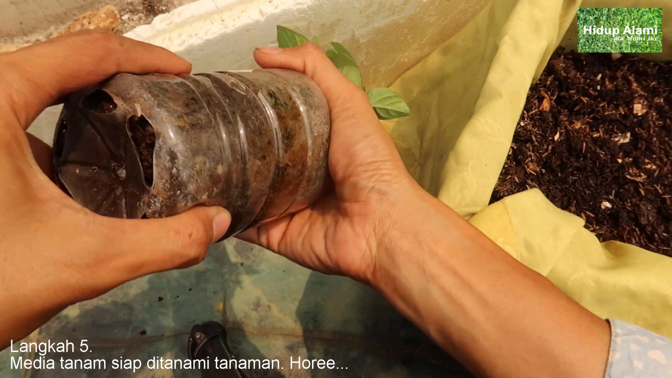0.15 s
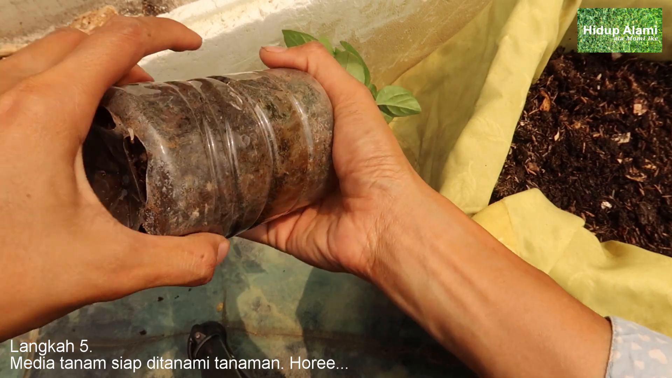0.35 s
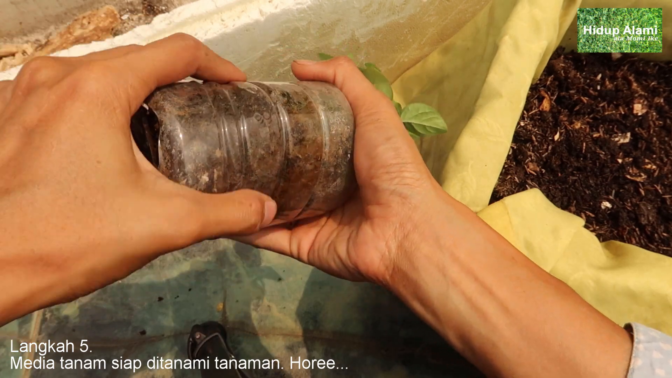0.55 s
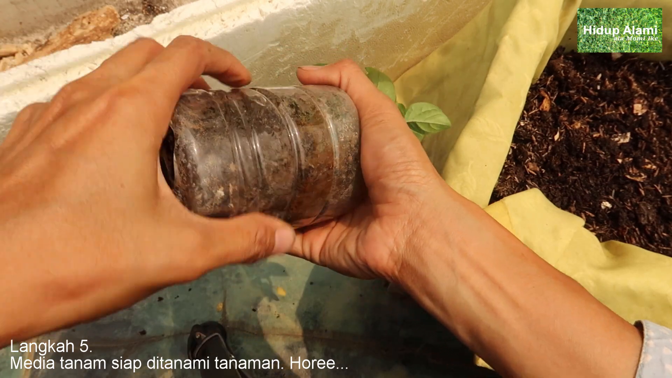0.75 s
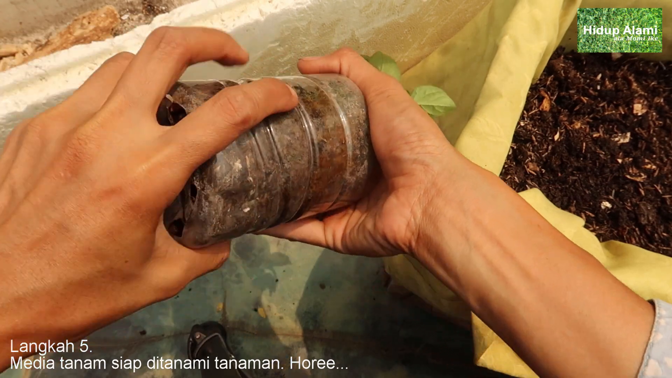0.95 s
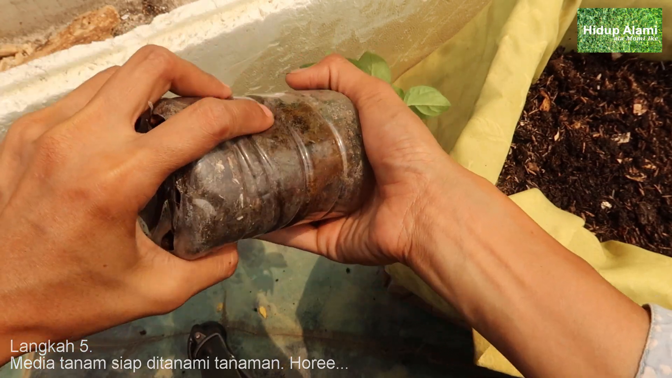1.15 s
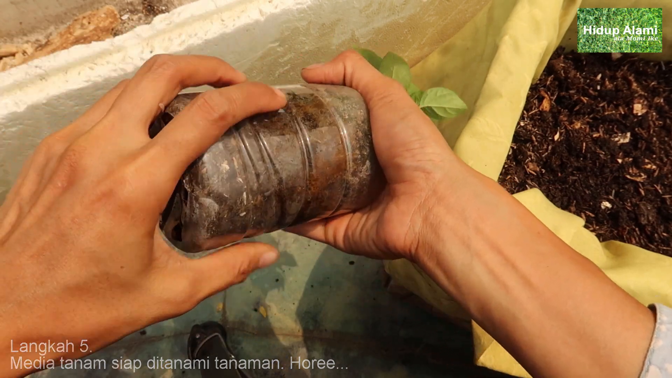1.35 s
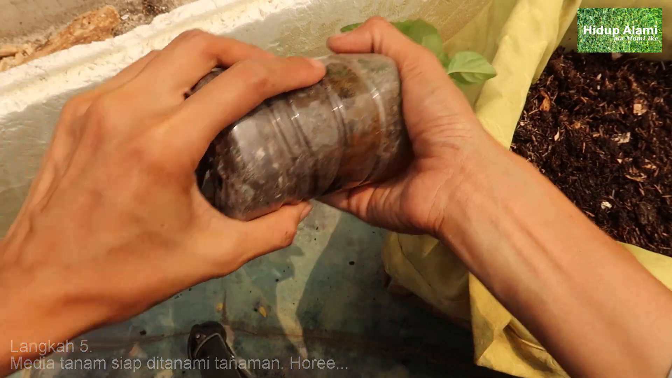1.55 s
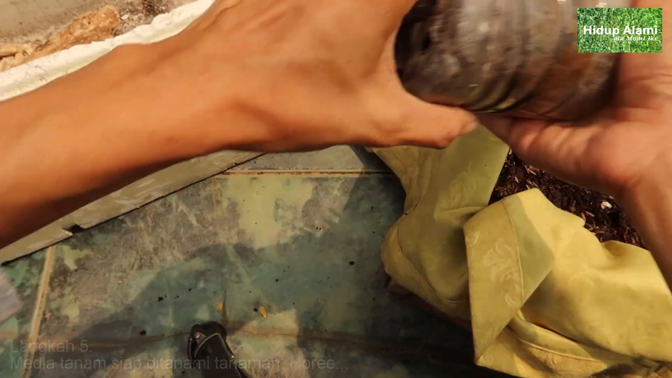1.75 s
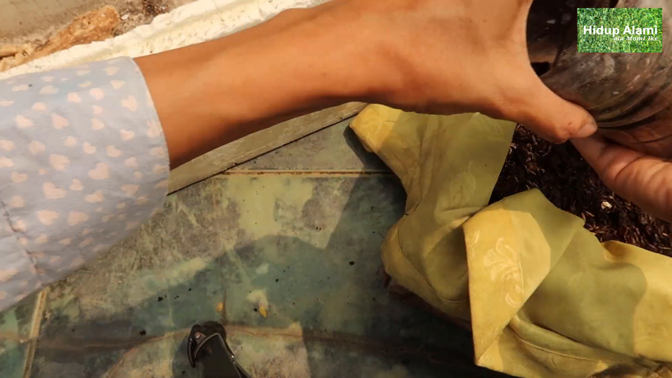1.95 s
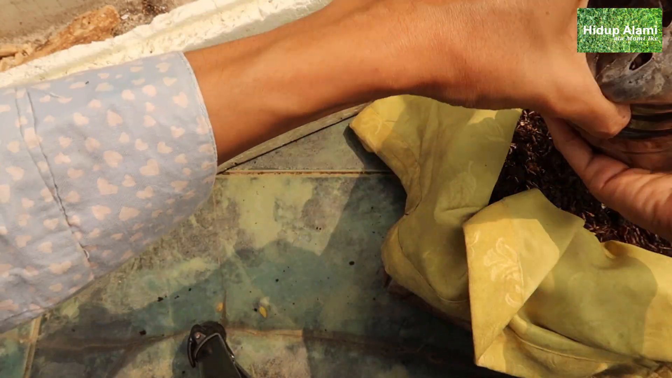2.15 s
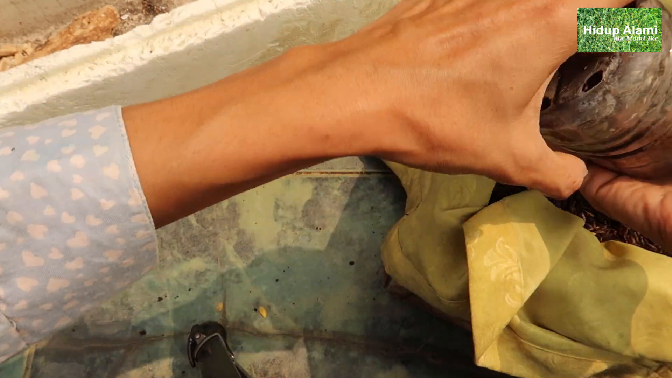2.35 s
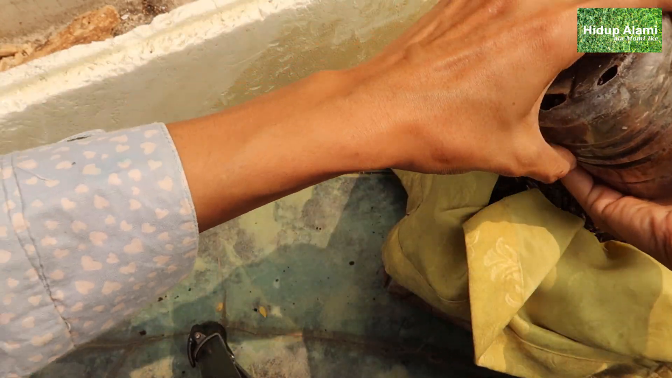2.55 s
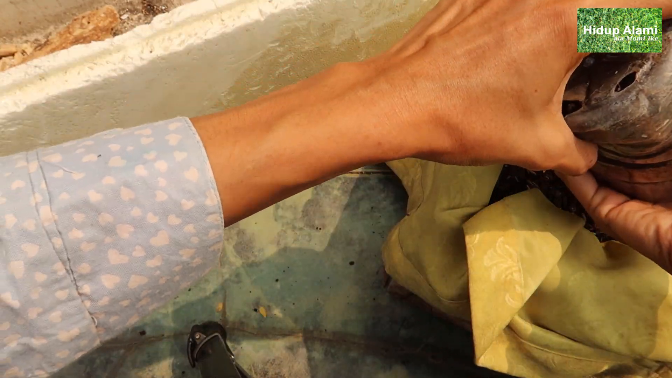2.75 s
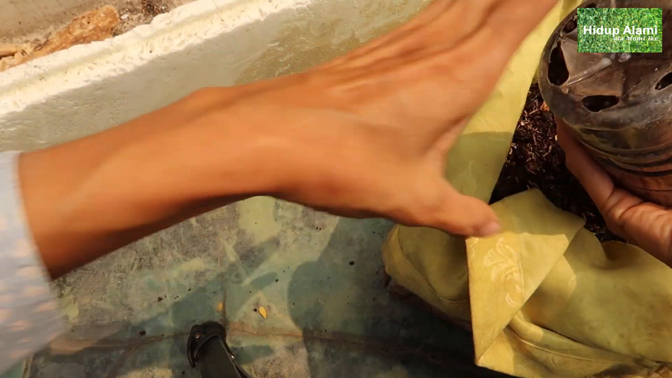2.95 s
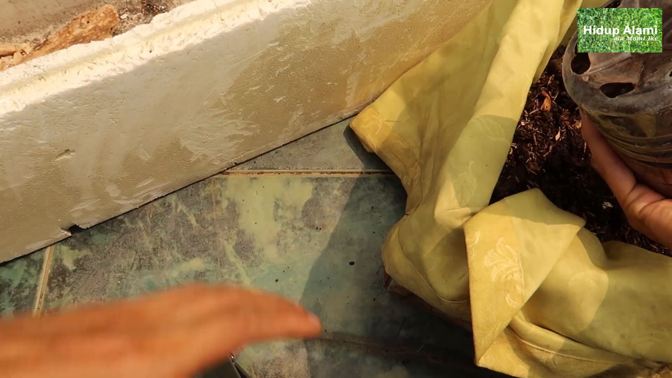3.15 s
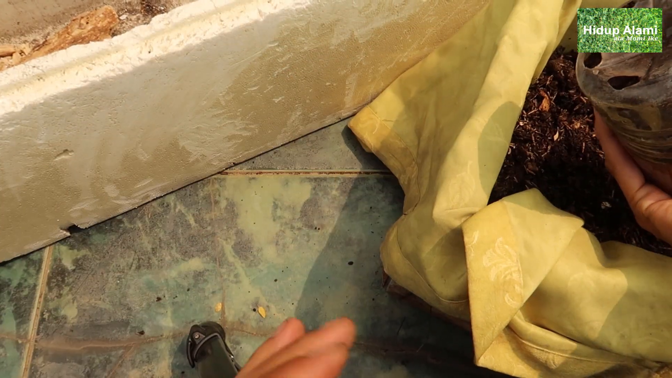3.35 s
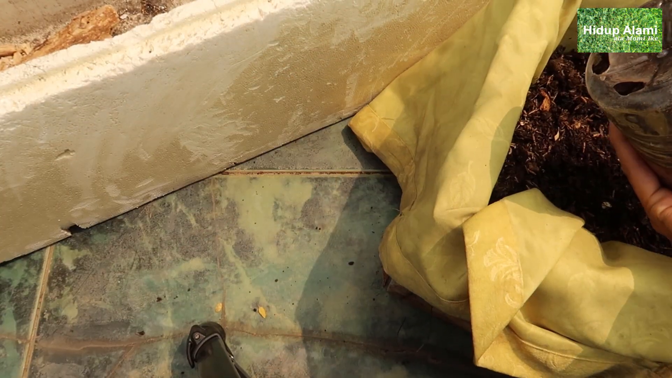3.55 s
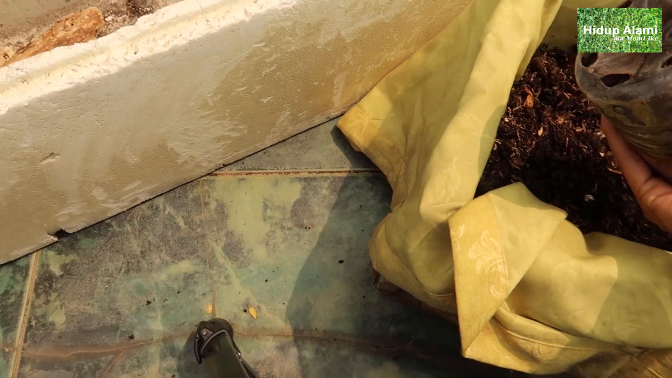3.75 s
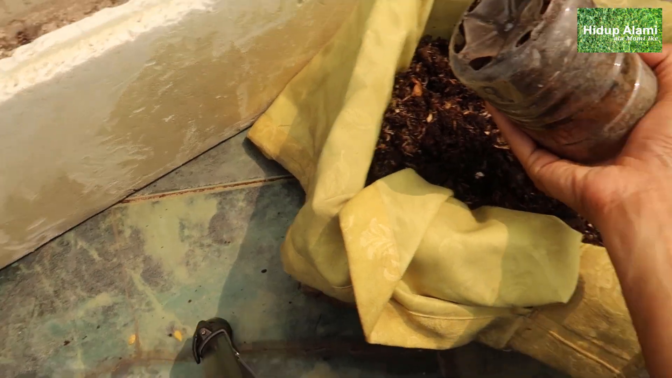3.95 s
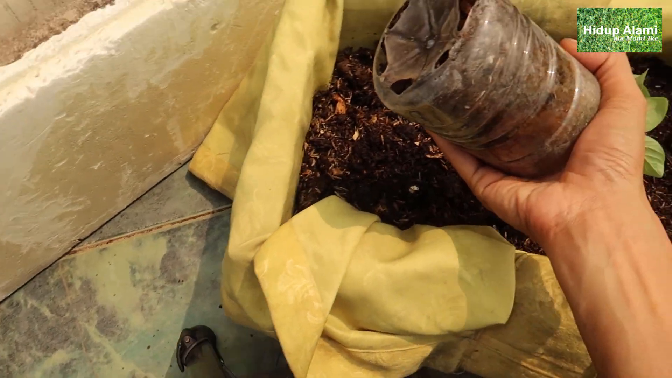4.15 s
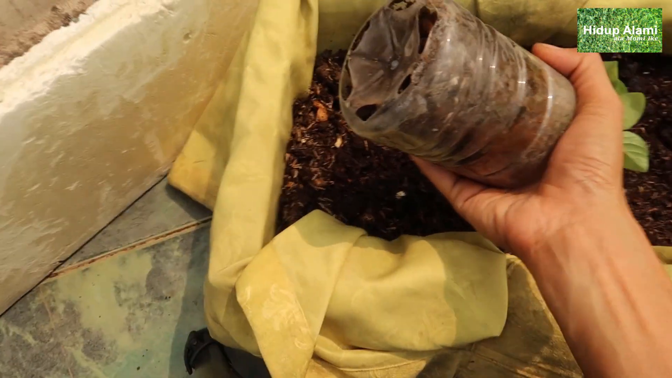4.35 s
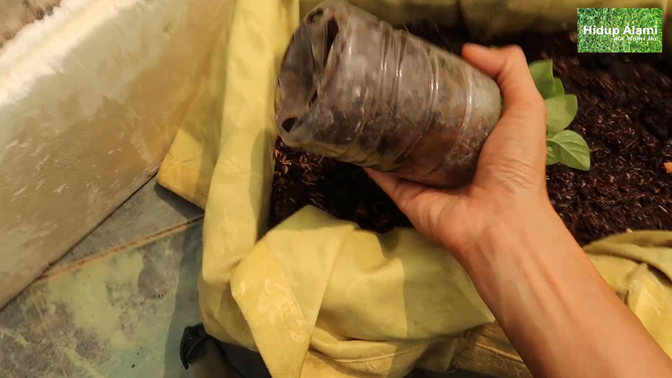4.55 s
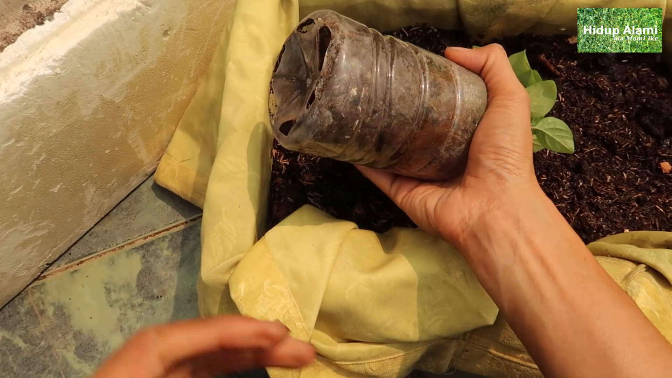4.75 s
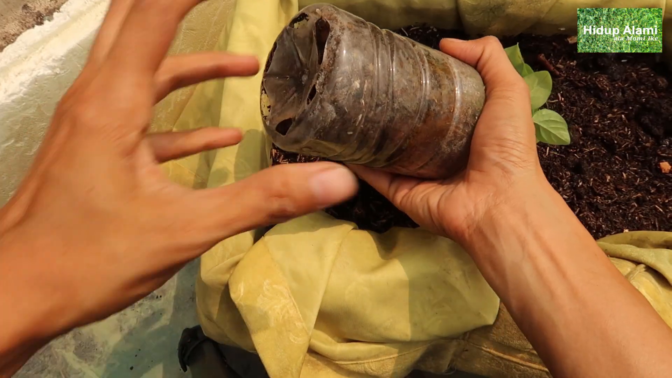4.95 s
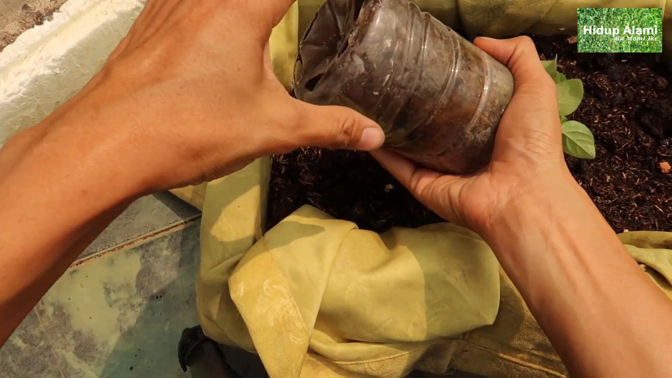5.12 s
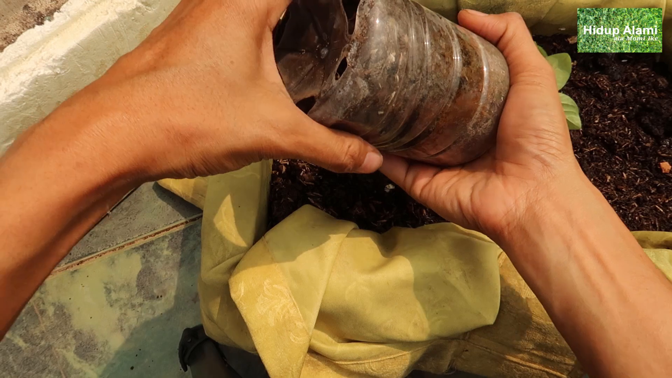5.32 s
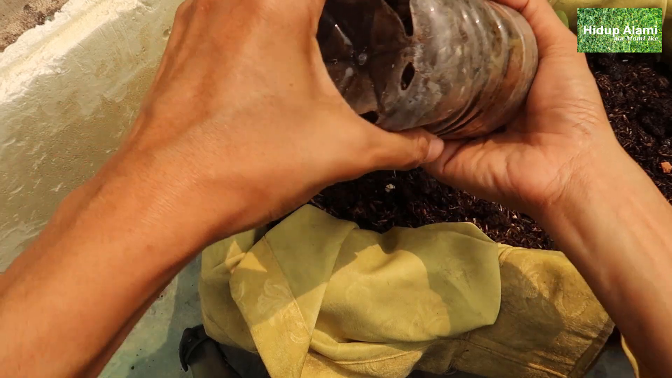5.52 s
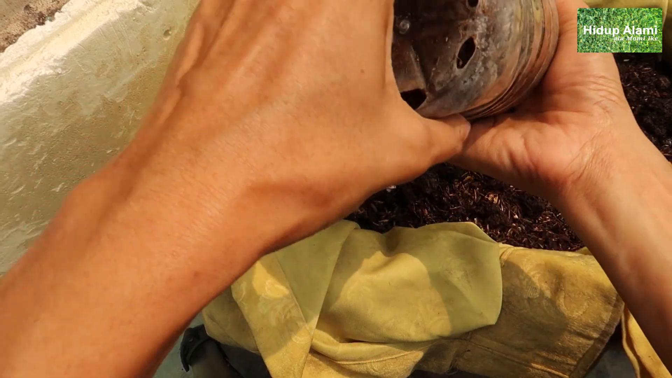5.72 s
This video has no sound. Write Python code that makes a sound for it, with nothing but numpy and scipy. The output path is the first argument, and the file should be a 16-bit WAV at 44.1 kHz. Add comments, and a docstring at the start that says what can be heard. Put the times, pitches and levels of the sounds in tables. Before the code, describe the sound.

Outdoors, close to a stereo microphone, a thin plastic bottle packed with soil is squeezed and turned by hand. From 0 to 0.35 s low wind pops flutter under a fast cluster of snaps, the loudest near 0.14 and 0.33. Each is a dry, bright crack with a short hollow knock, damped by soil, and a tiny scattered tail. Single strong cracks come around 0.65, 0.96, 1.17 and 1.45, with fine gritty rustling between. A faint thin whistle appears near 1.85. Crackle clusters follow at 2.2-2.4 and 2.75, then sharp snaps at 2.92 and 3.13; the whistle returns lower near 3.2. From 3.3 to 4.2 handling almost stops while a distant noise wash and motor hum climb. Dull small crackles resume at 4.3-4.6; wind buffets heavily, strongest at 4.8-5.1. Scratchy rubbing and lighter clicks follow, with one clearer snap near 5.62, over breeze and hum to the end.

```python
"""A thin plastic bottle full of soil, squeezed and rolled by hand outdoors, heard at two microphone ports.
Each dent snaps: slip bursts ring the damped wall, knock the body and shove the air; a scattered tail follows.
Fingers and grit rustle as filtered noise ticks; wind buffets the ports as banded noise with single pops.
Behind: a distant noise drone and the harmonics of a motor hum, both sinking and climbing back;
a faint sine whistle sounds twice."""
import sys
import numpy as np
from scipy import signal
from scipy.fft import rfft, irfft
from scipy.io import wavfile
from scipy.ndimage import uniform_filter1d

SR = 44100
rng = np.random.default_rng(int(sys.argv[2]) if len(sys.argv) > 2 else 0)


def bounce(signal):
    """Save signal as a 16-bit WAV file at the path given by the first command-line argument."""
    frames = np.transpose(np.atleast_2d(signal))
    limited = np.clip(frames, -1, 1)
    pcm = np.round(limited * 32767).astype(np.int16)
    wavfile.write(sys.argv[1], SR, pcm)


N = 254898

# far-off whistle: (time [s], pitch [Hz], level [dB])
WHISTLE = [(1.82, 3000, -95), (1.845, 3010, -74), (1.87, 3040, -80), (1.893, 3150, -75), (1.92, 3000, -80),
           (1.93, 2980, -120), (3.16, 2390, -120), (3.17, 2385, -90), (3.19, 2380, -68), (3.235, 2370, -71),
           (3.27, 2365, -66), (3.3, 2360, -70), (3.32, 2350, -90), (3.33, 2350, -120)]
# motor hum: (time [s], turning rate [Hz], reference level [dB])
HUM = [(0, 55.18, -75.5), (2.55, 52.2, -69.5), (2.67, 53.03, -60.5), (2.84, 57.2, -57), (2.97, 55.64, -60),
       (3.3, 55.86, -62.5), (3.7, 55.92, -58), (4.2, 56.08, -46), (4.7, 56.42, -46.5), (5.2, 56.9, -44),
       (5.5, 57.5, -46.5), (5.78, 58.3, -47)]
# hum harmonics: (multiple of turning rate, level re reference [dB])
HUM_LINES = [(2, -3.5), (3, -3.5), (4, -10.5), (5, -10.5), (6, 4), (7, -5.5), (8, -13.5), (9, -7.5),
             (10, -5), (11, -9.5), (12, -16)]
# distant drone: (time [s], level [dB])
DRONE = [(0.0, -50), (0.34, -57.5), (0.79, -52), (1.13, -56), (1.53, -62.5), (1.72, -62), (2.28, -55.5),
         (2.86, -55.5), (3.19, -57), (3.8, -52), (4.46, -43.5), (5.78, -43)]
# drone spectrum: (frequency [Hz], relative level [dB])
DRONE_COLOUR = [(250, -36), (430, -8.5), (620, -10), (900, -12), (1500, -18.5), (2860, -26.5),
                (5590, -41.5), (14000, -57)]
# breeze under the gusts: (time [s], big eddies [dB], small eddies re big [dB])
BREEZE = [(0, -42.5, -5), (.4, -51.5, 2), (1.0, -53, 2), (1.45, -50.5, -2), (1.55, -66, 4),
          (2.05, -57.5, 0.5), (2.3, -47.5, -8), (2.55, -60.5, 8), (3.28, -54.5, -3.5), (3.9, -47.5, -2.5),
          (4.25, -43, 1.5), (4.75, -37, -5.5), (5.2, -33, -2.5), (5.45, -32, -12), (5.67, -44, 8.5),
          (5.78, -31.5, -10)]
# wind spectrum: (frequency [Hz], relative density [dB per Hz])
WIND_COLOUR = [(15, -55.5), (25, -23.5), (76, -5), (124, -8), (189, -1), (380, -6.5), (447, -10),
               (579, -21), (628, -24.5), (1200, -44), (1560, -73), (2640, -120)]
# gusts: (time [s], length before decay [s], big eddies [dB], small eddies re big [dB], share unlike in the ports [0-1])
GUSTS = [(0.034, 0.071, -33, 6.5, 0.2), (0.115, 0.096, -38.5, 7, 0.33), (0.233, 0.11, -47, 5, 0.3),
         (0.89, 0.052, -52, -5, 0), (2.104, 0.029, -46, -10, 0), (2.637, 0.18, -51.5, -11.5, 0.03),
         (2.814, 0.079, -44, -15, 0.2), (3.369, 0.06, -51, -7.5, 0.1), (4.263, 0.053, -39, -9, 0.12),
         (4.363, 0.018, -26, -12, 0), (4.447, 0.031, -32.5, -9, 0.1), (4.527, 0.05, -32, -21, 0.5),
         (4.616, 0.031, -26, -16, 0.25), (4.785, 0.23, -28, 0.5, 0.93), (5.024, 0.062, -30.5, -0.5, 0.64)]
# single eddies popping on the ports: (time [s], peak [dB], frequency [Hz], left minus right [dB])
POPS = [(0.063, -16.5, 322, -9), (0.078, -15, 320, 1), (0.09, -33, 191, -1), (0.106, -17.5, 397, -8),
        (0.141, -17, 306, 3), (0.166, -17, 366, 6), (0.175, -14.5, 390, 1), (0.184, -38, 639, 17),
        (0.199, -17, 228, 1), (0.221, -25.5, 310, 8), (0.268, -30, 332, -4), (0.311, -25, 317.5, 2),
        (4.27, -22.5, 196, 0.5), (4.559, -25.5, 226, 3), (4.634, -33, 322, 2), (4.799, -9.5, 250, -9),
        (4.812, -12.5, 230, 1), (4.827, -28, 150.5, 12), (4.843, -8.5, 252, -3), (4.875, -17, 170, 3),
        (4.888, -26, 560, -4), (4.894, -15, 296, -8), (4.909, -28.5, 580, 22), (4.928, -18, 139.2, -2),
        (4.983, -27, 620, 11.5), (4.905, -7.5, 236, 0.5), (4.946, -35, 315, 6), (4.974, -9, 181, -2),
        (4.996, -15, 130.7, 6), (4.99, -19.5, 386, 0), (5.007, -28, 321, 1), (5.03, -15.5, 220, -4),
        (5.041, -20.5, 132, 3), (5.074, -18, 200, 4)]
# fingers and grit sliding: (time [s], length before decay [s], level [dB], scrape re level [dB])
STROKES = [(0, 0.15, -59, -4), (0.182, 0.19, -60.5, -1), (0.362, 0.044, -76, 1.5), (0.429, 0.11, -72, 1),
           (0.723, 0.14, -75, -14), (0.547, 0.11, -64, -3), (0.809, 0.069, -65, 1), (0.893, 0.097, -64, -4),
           (1.014, 0.01, -63, -8), (1.056, 0.19, -62.5, -5), (1.379, 0.11, -66, 0),
           (1.794, 0.11, -63.5, -4), (1.992, 0.13, -72, 1), (2.107, 0.16, -65.5, -4),
           (2.295, 0.13, -64, -2.5), (2.455, 0.041, -70, -5), (2.53, 0.076, -82.5, 1),
           (2.612, 0.02, -66.5, -4), (2.652, 0.14, -65, 1.5), (2.82, 0.15, -66.5, 0.5), (3.3, 0.04, -76, 5),
           (3.564, 0.1, -74.5, -2), (3.694, 0.53, -90.5, 5), (4.267, 0.017, -59.5, 2),
           (4.37, 0.022, -75.5, -2), (4.465, 0.026, -69, -7), (4.635, 0.37, -67.5, -15),
           (5.057, 0.039, -52.5, 0), (5.134, 0.048, -56, -5), (5.199, 0.032, -50, -4),
           (5.253, 0.071, -55.5, -3), (5.359, 0.03, -55, -2), (5.396, 0.075, -57, -1),
           (5.486, 0.16, -60.5, -2), (5.645, 0.099, -76, 4), (5.705, 0.022, -51, 1), (5.729, 0.051, -53, 0)]
# rustle spectrum: (frequency [Hz], relative level [dB])
RUSTLE_COLOUR = [(2500, -11), (3600, -9.5), (4600, 0), (7000, -5.5), (10000, -11.5), (14000, -15.5),
                 (16300, -29)]
# dents: (time [s], low ring [Hz], peak [dB], crack [Hz], peak [dB], bright ring [Hz], peak [dB],
# top ring [Hz], peak [dB], air peak [dB], knock peak [dB], knock [Hz], slip decay at 2500 Hz [ms], thump re knock [dB])
SNAPS = [(0.0701, 2100, -30, 2800, -15.5, 6400, -15.5, 7500, -22, -39, -25.5, 990, 3.3, -24.0),
         (0.1064, 2740, -17.5, 4310, -16.0, 7100, -16, 7900, -18, -24, -25.5, 1050, 5.5, -30.0),
         (0.1385, 2130, -24.5, 2950, -21, 6100, -33, 7500, -40.5, -54.0, -14, 1190.0, 2.1, -30.0),
         (0.1423, 2610, -7, 3550, -5.5, 6360, -6.0, 7180, -23, -17.5, -8, 1040, 2.7, -30),
         (0.1727, 2140, -57, 3380, -40, 5180, -45, 8110, -52, -60.5, -38, 730, 4.0, -30.0),
         (0.2312, 2080, -52.0, 2900, -44.5, 5760, -48, 8100, -49, -57.5, -60.5, 760.0, 1.9, -30.0),
         (0.2671, 2560, -59, 3970, -56, 6900, -43.5, 7850, -39, -51.5, -47, 980.0, 17.0, -21.5),
         (0.3063, 2670, -52.5, 3420, -52, 4800, -52.0, 7540, -56, -54, -29.5, 980, 5.2, -30.0),
         (0.3268, 2120, -27, 3070, 0.5, 6220, -2.5, 8100, -10, -21, 0, 977, 2.2, -41),
         (0.347, 2030, -23.5, 3000, -15.5, 4830, -23, 7440, -34, -48.0, -24.5, 910, 5.1, -27.5),
         (0.4315, 2410, -62, 3900, -58, 5200, -54, 8000, -64, -64, -70, 907, 1.9, -30),
         (0.582, 2400, -63, 4000, -54, 6500, -50, 8500, -57, -56, -69, 900, 1.5, -30.5),
         (0.6475, 1940, -19, 3070, -17.5, 6070, -12.5, 9300, -15, -10.5, -20.5, 1100, 4.4, -31),
         (0.6565, 2000, -40, 2980, -37, 5460, -45, 7570, -46.0, -48.5, -21.0, 1033, 1.9, -28),
         (0.7054, 2170, -28.5, 3180, -41, 5260, -41.5, 9320, -49, -46, -32.5, 1120, 2.2, -20.0),
         (0.7863, 1860, -28.5, 3240, -34, 5300, -34.5, 8160, -42.0, -40, -23.5, 870, 5.5, -12),
         (0.9478, 2020, -36, 2880, -37.5, 5610, -34, 7630, -44.5, -43, -33, 933.0, 5.6, -24),
         (0.9593, 2240, -3, 3010, 2.5, 4550, 0, 7750, -3, -3, -4.0, 1065, 2.2, -39.0),
         (1.0574, 2400, -51.5, 3900, -62, 6000, -53, 8000, -58, -66, -70, 900, 1.5, -28),
         (1.125, 2070, -53.0, 2920, -39, 4760, -42, 8110, -46, -51, -70.0, 1022.0, 4.7, -30.0),
         (1.1678, 2860, -19, 4120, -12, 5600, -2.0, 7220, -5.5, -14, -5.5, 1084, 5.4, -25.5),
         (1.2102, 2100, -32, 2950, -24.5, 4730, -28, 7740, -39, -41, -35.0, 1071.0, 4, -29),
         (1.2408, 2060, -24.5, 2920, -19.5, 5000, -18, 7500, -28.0, -16, -23, 1036, 2.5, -33.0),
         (1.2434, 2060, -21.5, 3480, -15.0, 4870, -13.5, 7500, -19.0, -14, -24, 1114.0, 4.7, -39),
         (1.4041, 2210, -43, 3120, -44.5, 6020, -62, 7560, -58.5, -65.5, -37.0, 1260, 7.5, -33),
         (1.4544, 2540, -6, 3160, -0.5, 6035, -0.5, 7650, -12, -8.5, -7.5, 1047, 4.3, -16.5),
         (1.8922, 1890, -57, 3180, -54, 6600, -37, 7500, -42.5, -53.5, -66.0, 1063.0, 1.8, -37.5),
         (2.2124, 1910, -21.5, 3780, -23.5, 6700, -28.5, 7500, -28, -39, -28, 1054, 8.3, -25),
         (2.2207, 2040, -41, 3700, -21, 5300, -27.5, 7500, -38, -46, -24, 935, 3.6, -24),
         (2.2335, 1960, -56.5, 3490, -40, 6060, -45, 8470, -48.0, -55.0, -38.0, 1040, 4.3, -28.0),
         (2.2582, 2400, -60, 4400, -53.0, 6770, -41, 7810, -37, -29, -68, 931.0, 1.1, -30.0),
         (2.3339, 2220, -48, 4040, -44, 4900, -51, 8210, -49, -56, -74.0, 753.0, 5.4, -36),
         (2.3781, 2280, -14, 4100, -13.5, 4600, -25, 7900, -30, -38, -7, 954, 3.1, -43),
         (2.3822, 1820, -23, 2695, -10, 4800, -22, 7500, -39, -52.5, -30.0, 850, 1.2, -16),
         (2.4012, 2960, -14, 4200, -3.5, 4850, -4.5, 7770, -10.5, -23.5, -20, 843, 3, -33),
         (2.4052, 2330, -16, 3200, -19.0, 5200, -26.5, 7500, -31.5, -42, -25.0, 890, 1.7, -30.0),
         (2.4128, 2090, -30, 3000, -33, 6260, -40.5, 7500, -38, -57, -26.5, 910, 3.7, -29),
         (2.7496, 2000, -25, 2880, -14.5, 5780, -11.5, 9000, -20.5, -12, -17.5, 990, 5.6, -32),
         (2.7533, 2340, -20, 3600, -23, 6200, -23, 8700, -24, -43, -19.5, 1150, 7.1, -30),
         (2.9222, 1990, -14.5, 3760, -3.5, 5800, -3, 8200, -9, -25.5, -15.5, 970, 1.8, -13.5),
         (2.9266, 2388, -34, 3420, -31, 5250, -21.5, 8410, -28.5, -38.5, -33.5, 846, 1.1, -21.5),
         (3.1277, 2160, -11.5, 3184, -14, 5680, -6.5, 8530, -11.5, -9.5, -10, 930, 2.8, -26),
         (4.2825, 2620, -29, 3270, -31.5, 4800, -40.5, 8090, -56, -60, -28, 981, 14, -35),
         (4.295, 2000, -36, 2820, -31, 4900, -33.5, 8610, -54, -62.0, -27.5, 864.0, 7.3, -36.0),
         (4.378, 2180, -45, 3040, -32, 5580, -48, 7520, -60.5, -71.5, -28.0, 830, 2.4, -33),
         (4.3905, 2670, -42, 4340, -44, 4800, -38.5, 7670, -58, -72.5, -44, 1122.0, 4.6, -25.0),
         (4.4218, 2360, -51, 3200, -41, 5380, -60.5, 9300, -70.0, -73, -33, 880, 2.4, -30.0),
         (4.4689, 2400, -54, 4000, -42, 5200, -50, 8000, -60, -70, -47, 900, 3, -30),
         (4.4844, 2450, -33, 3200, -39, 5170, -44, 8530, -60, -71.0, -28, 780, 5.9, -35.0),
         (4.546, 1910, -35, 3000, -44, 4800, -42, 8810, -65.5, -68.5, -31.0, 1000, 14, -27.0),
         (4.5593, 2600, -39, 3920, -35, 5700, -32.5, 7780, -50, -68.0, -33, 810.0, 5.3, -29),
         (5.0694, 2750, -29, 4009, -27, 4700, -27.0, 8600, -34.5, -31, -19.5, 830, 6, -21),
         (5.1387, 2100, -43, 2950, -42, 4800, -51, 7760, -49, -54.0, -55.0, 900.0, 3.0, -30.0),
         (5.1665, 2200, -46.0, 3060, -37, 6190, -46, 8270, -48, -45.5, -35.0, 1050.0, 6.8, -30.0),
         (5.1705, 2500, -44, 3300, -45, 5800, -47, 8500, -48, -52, -53, 900, 1.5, -30),
         (5.2016, 2500, -47.5, 4190, -46.5, 6080, -46.5, 8290, -46.0, -50.5, -55.0, 900.0, 3.0, -30.0),
         (5.3685, 2500, -32.5, 4450, -44, 5050, -28.5, 8050, -46, -49.0, -40, 752.0, 1.6, -30.0),
         (5.5857, 2270, -31, 3000, -36.0, 5610, -38.5, 8390, -46, -39, -20.5, 885, 2.1, -30.0),
         (5.5989, 2908, -37.5, 3530, -29, 4800, -27.0, 7760, -42.5, -51.5, -31, 860.0, 2.9, -30.0),
         (5.6213, 2460, -20, 3400, -21, 6060, -31.5, 8260, -33.5, -33.0, -16.5, 850, 2.8, -30.0),
         (5.6239, 2440, -13.5, 3350, -13, 5920, -8.5, 8460, -16.5, -24, -12, 887, 1, -11),
         (5.6954, 2290, -49, 3380, -48.0, 5530, -56.5, 8690, -63.5, -67.5, -55.0, 900.0, 2.0, -30.0),
         (5.7143, 2050, -33.5, 2940, -30.5, 6050, -38.0, 7540, -41, -33, -53.0, 942.0, 2.7, -20.0),
         (5.7425, 2308, -33, 3680, -40, 6900, -48, 7500, -51, -48.5, -32, 1060, 11, -30.0)]
# ring bandwidths, damped by soil and hands: (low, crack, bright, top, air [Hz])
RING_WIDTHS_HZ = [800, 1150, 1650, 1700, 5000]
# where the bottle is held: (time [s], left lag [microseconds])
PLACE = [(0, -19), (1.5, -19), (1.85, 29), (3.2, 25.5), (4.25, -48), (4.6, -47), (5.05, -18), (5.6, 19),
         (5.78, 0)]

GUST_SPLIT_HZ = 174  # big eddies below, small above
GUST_ATTACK_S, GUST_RELEASE_S = 0.04, 0.01
BREEZE_WAVER_DB, BREEZE_UNLIKE = 1.5, 0.062
STROKE_ATTACK_S, STROKE_RELEASE_S, STROKE_WAVER_DB = 0.01, 0.018, 1.2
RESTING_DB = -81  # hands lying still on the wall
FIRST_SLIP = 14.0  # opening click re the slips that follow
AIR_HZ, CAVITY_HZ = 13000, 877  # air ring; air inside the bottle
TAIL_SPREAD = 1.9  # tail bandwidth re ring
KNOCK_S, KNOCK_SLIPS = 0.0033, 1.5  # knock hold; share of slips in it
PAN_DB_PER_US = -.022  # the later port hears it softer
TOP_HZ = 16500


def undb(db):
    """Decibels to gain."""
    return 10 ** (np.asarray(db) / 20)


def curve(table):
    """Table columns interpolated to one value a sample."""
    time_s, *columns = np.transpose(table)
    return [np.interp(np.arange(N) / SR, time_s, c) for c in columns]


def colour(x, points):
    """Shape the spectrum of x by (Hz, dB) points; rms 1."""
    hz, db = np.transpose(points)
    bin_hz = np.maximum(np.arange(N // 2 + 1) * SR / N, 1)
    gain_db = np.interp(np.log(bin_hz), np.log(hz), db, left=-90, right=-90)
    y = irfft(rfft(x) * undb(gain_db), N)
    return y / np.sqrt(np.mean(y ** 2))


def walk(rate_hz):
    """Random levels held 1 / rate_hz and smoothed twice; spread near 1."""
    hold = int(SR / rate_hz)
    steps = np.repeat(rng.standard_normal(N // hold + 1), hold)
    return 1.3 * uniform_filter1d(uniform_filter1d(steps, hold), hold)[:N]


def ports(mid, side):
    """Left and right from what they share and what differs."""
    return np.array([mid + side, mid - side])


def band(x, lo_hz, hi_hz):
    """Steep band-pass along the last axis."""
    sos = signal.butter(3, [lo_hz, min(hi_hz, .45 * SR)], "band", fs=SR, output="sos")
    return signal.sosfilt(sos, x)


def peak(x, db):
    """Scale x to a peak level."""
    return x * undb(db) / np.max(np.abs(x))


def shape(start_s, length_s, attack_s, release_s):
    """Gain of one gesture: rise, hold, die away."""
    u = np.arange(N) / SR - start_s
    return np.clip(u / attack_s, 0, 1) * np.exp(-np.maximum(u - length_s, 0) / release_s)


def whistle():
    """One thin tone, wavering in pitch and level."""
    hz, level_db = curve(WHISTLE)
    phase = 2 * np.pi * np.cumsum(hz * (1 + 0.007 * walk(90))) / SR
    return np.sqrt(2) * np.sin(phase) * undb(level_db + 4.0 * walk(60))


def hum():
    """A distant motor: wavering multiples of its turning rate."""
    hz, level_db = curve(HUM)
    turn = 2 * np.pi * np.cumsum(hz * (1 + .0027 * walk(5))) / SR
    lines = sum(undb(db + 3.0 * walk(8)) * np.sin(round(k) * turn + k * k) for k, db in HUM_LINES)
    return np.sqrt(2) * lines * undb(level_db)


def drone():
    """Far-off noise wash, alike in the bass and unlike in the treble."""
    mid = colour(rng.standard_normal(N), DRONE_COLOUR)
    tilted = [(hz, db + 6.0 * np.log2(hz / 5000)) for hz, db in DRONE_COLOUR]
    side = undb(-15.5) * colour(rng.standard_normal(N), tilted)
    return ports(mid, side) * undb(curve(DRONE)[0])


def wind():
    """Big eddies press both ports nearly alike; small quick ones differ between them and come in lumps."""
    breeze_db, small_re_big_db = curve(BREEZE)
    big_gain = undb(breeze_db + BREEZE_WAVER_DB * walk(26))
    small_gain = big_gain * undb(small_re_big_db)
    unlike = np.full(N, BREEZE_UNLIKE)
    for start_s, length_s, big_db, small_db, share in GUSTS:
        gust = shape(start_s, length_s, GUST_ATTACK_S, GUST_RELEASE_S)
        big_gain = big_gain + undb(big_db) * gust
        small_gain = small_gain + undb(big_db + small_db) * gust
        unlike = np.maximum(unlike, share * gust)
    unlike = np.clip(unlike, 0, 1)

    def eddies(lo_hz, hi_hz):
        y = band(colour(rng.standard_normal(N), WIND_COLOUR), lo_hz, hi_hz)
        return y / np.std(y) * undb(3.5 * unlike * walk(60))

    big = big_gain * eddies(26, GUST_SPLIT_HZ)
    small = small_gain * eddies(GUST_SPLIT_HZ, 1200)
    side = unlike * (small_gain * eddies(240, 1500) + undb(-20.0) * big_gain * eddies(45, 120))
    return ports(big + small, side - .15 * unlike * small)  # the right port faces the wind


def pops():
    """Each pop is a cycle or two of pressure, sharp at the front; only its upper part differs between the ports."""
    mid, side = np.zeros(N), np.zeros(N)
    u = np.arange(1024) / SR
    for time_s, peak_db, hz, pan_db in POPS:
        pulse = -np.sin(2 * np.pi * hz * u) * (u * hz) * np.exp(-u * hz / 0.41)
        pulse = peak(pulse, peak_db)
        i = int((time_s + 0.00212) * SR)  # onset trails the listed time
        left, right = undb(np.array([.5, -.5]) * pan_db)
        mid[i:i + len(u)] += pulse * (left + right) / 2
        side[i:i + len(u)] += pulse * (left - right) / 2
    return ports(band(mid, 40, 3000), band(side, 130, 3000))


def rustle():
    """Dense tiny ticks of uneven size over a soft slide; each stroke adds a duller scrape."""
    def grains():
        ticks = (rng.random(N) < 2500 / SR) * undb(0.91 * np.minimum(rng.exponential(size=N), 3))
        grit = 6.0 * (rng.random(N) < 40 / SR)  # now and then a larger grain gives way
        return rng.standard_normal(N) * (ticks + grit + 0.37)

    contact = np.array([shape(start_s, length_s, STROKE_ATTACK_S, STROKE_RELEASE_S)
                        for start_s, length_s, _, _ in STROKES])
    level_db, scrape_db = np.array(STROKES)[:, 2:].T
    both = ports(grains(), 0.46 * grains())
    fine = np.array([colour(x, RUSTLE_COLOUR) for x in both])
    fine = fine * (undb(level_db) @ contact + undb(RESTING_DB))
    scrape = band(both, 1600, 4400)
    scrape = scrape / np.std(scrape) * (undb(level_db + scrape_db) @ contact)
    wavering = fine * undb(2.0 * walk(50)) + scrape * undb(2.0 * walk(54))
    return wavering * undb(STROKE_WAVER_DB * walk(28))


def snap(t, wall_hz, wall_db, body_db, thump_db, body_hz, slip_ms, noise):
    """One dent: a burst of slips through the damped wall resonances, the body knock, then a scattered tail."""
    u = np.maximum(t, 0)
    click = np.diff(1. * (t > 0), prepend=0)

    def scatter(hz):
        pitch = hz / 2500  # the treble scatters less and dies sooner
        decay = np.exp(-u / 0.0087 * pitch ** .12)
        return undb(-10.5) * pitch ** -.3 * (1 - np.exp(-u / 0.00029)) * decay

    def push(slip_s, tail, first):
        # the tail comes off hands and ground, so it partly differs between the ports
        burst = np.minimum(u / 0.000081, 1) * np.exp(-u / slip_s)
        return first * click + noise[0] * (burst + tail) + 0.6 * tail * noise[1:]

    rings = 0
    for hz, db, width_hz in zip(wall_hz, wall_db, RING_WIDTHS_HZ):
        slip_s = slip_ms / 1000 * (hz / 2500) ** -.7  # higher resonances die sooner
        ring = band(push(slip_s, 0, FIRST_SLIP), hz - width_hz / 2, hz + width_hz / 2)
        wide_hz = min(TAIL_SPREAD * width_hz, 5000)
        tail = scatter(hz) * (noise[0] + .6 * noise[1:])
        tail = band(tail, hz - wide_hz / 2, hz + wide_hz / 2) / np.sqrt(TAIL_SPREAD)
        rings = rings + peak(ring + tail, db)
    # the soil damps the knock within a few cycles; the cavity note lingers and beats with it
    knock = np.sin(2 * np.pi * body_hz * u) * np.exp(-(u / KNOCK_S) ** 1.6)
    # loose soil keeps the cavity note uneven
    rattle = band(noise[1] * np.exp(-u / 0.011), .9 * CAVITY_HZ, 1.14 * CAVITY_HZ)
    cavity = peak(rattle, -18.5)
    swell = np.sin(np.pi / 2 * np.minimum(u / 0.00027, 1)) ** 2
    slips = band(push(slip_ms / 1400, scatter(2600), 1.0), .87 * body_hz, 1.45 * body_hz)
    body = swell * (knock + cavity) + KNOCK_SLIPS * slips
    body = band(body, 740, 4800)  # too small a wall to radiate bass
    # the wall flips outward and shoves the air once
    thump = peak(band(np.exp(-u / 0.0006) * (t > 0), 45, 650), thump_db)
    return rings + peak(body, body_db) + thump


def bottle():
    """Every snap at its own moment and colour; lag and level between the ports place the bottle."""
    size = 4096
    out = np.zeros((2, N + size))
    noise = rng.standard_normal((len(SNAPS), 3, size))
    t = np.arange(size) / SR - .0018
    bin_hz = np.arange(size // 2 + 1) * SR / size
    half = np.array([[.5], [-.5]])  # left, right
    for k, (time_s, *rings, air_db, body_db, body_hz, slip_ms, thump_db) in enumerate(SNAPS):
        i = int((time_s - .002) * SR)
        lag_us = np.interp(time_s, *np.transpose(PLACE))
        wall_hz, wall_db = rings[::2] + [AIR_HZ], rings[1::2] + [air_db]
        y = snap(t, wall_hz, wall_db, body_db, body_db + thump_db, body_hz, max(slip_ms, .2), noise[k])
        y = irfft(rfft(y) * np.exp(-2j * np.pi * bin_hz * half * lag_us / 1e6), size)
        out[:, i:i + size] += y * undb(half * PAN_DB_PER_US * lag_us)
    return out[:, :N]


def scene():
    """All sources at the two ports."""
    return whistle() + hum() + drone() + wind() + pops() + rustle() + bottle()


def record(dry):
    """Peaks clip at a ceiling; then the top is cut."""
    sos = signal.ellip(8, .2, 70, TOP_HZ, fs=SR, output="sos")
    return signal.sosfilt(sos, np.clip(dry, -.95, .95))


dry = scene()
out = record(dry)
bounce(out)
```